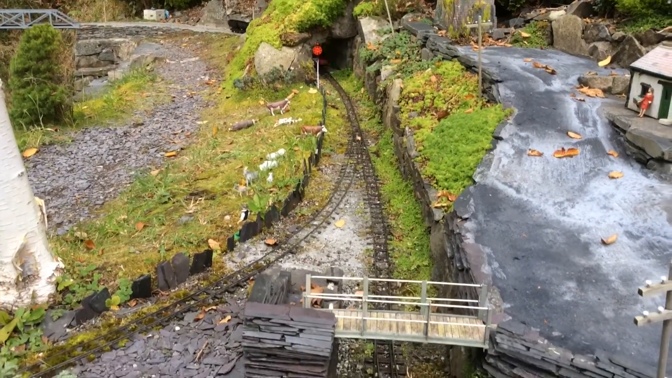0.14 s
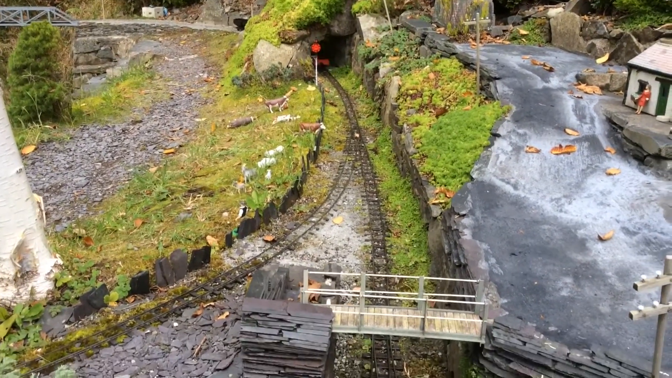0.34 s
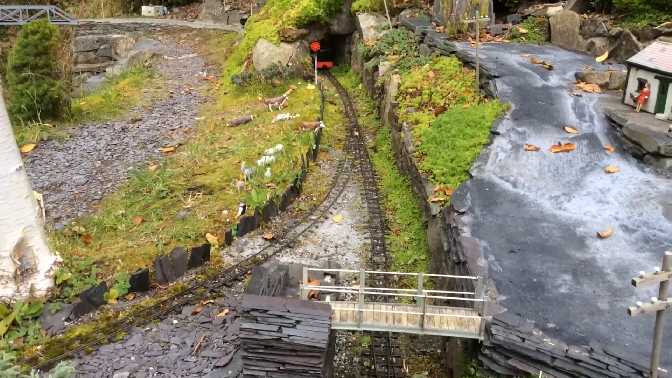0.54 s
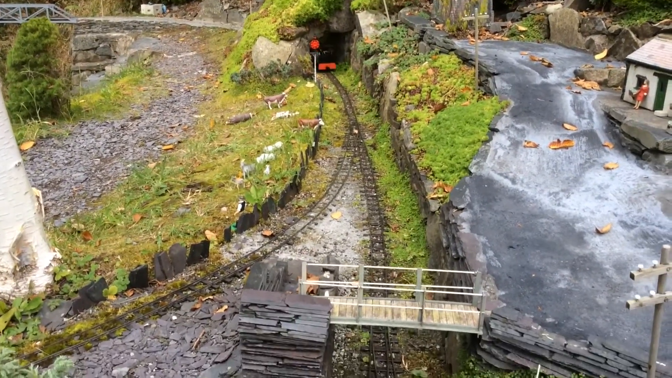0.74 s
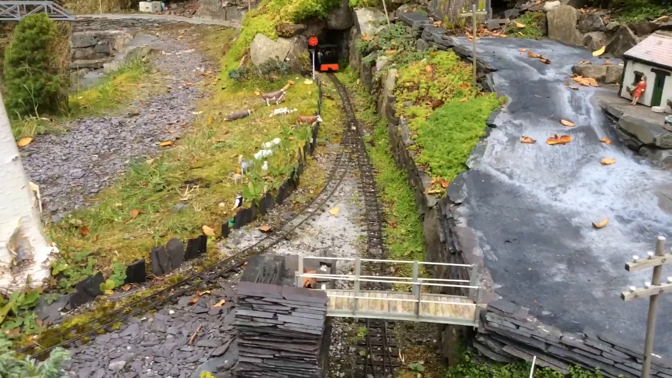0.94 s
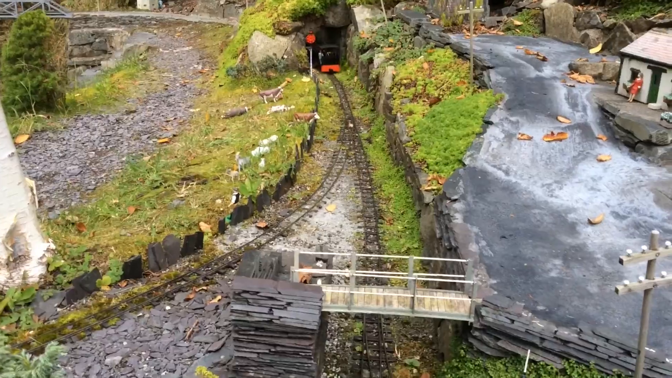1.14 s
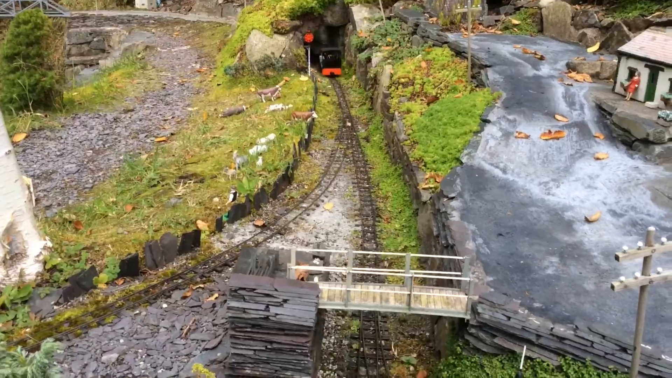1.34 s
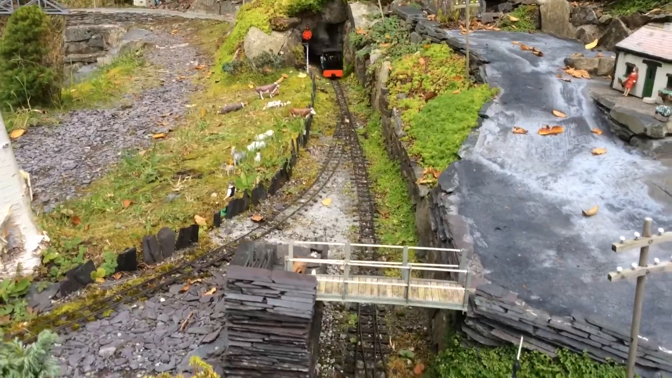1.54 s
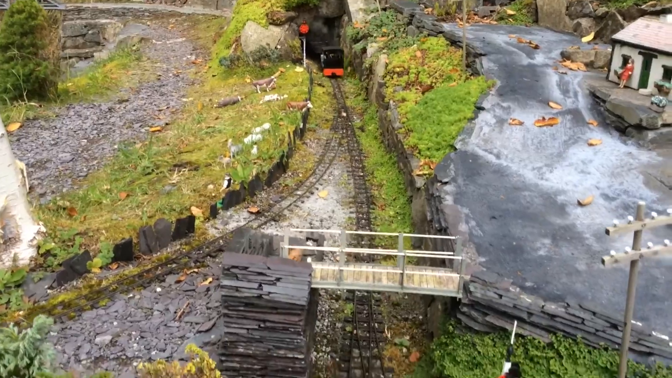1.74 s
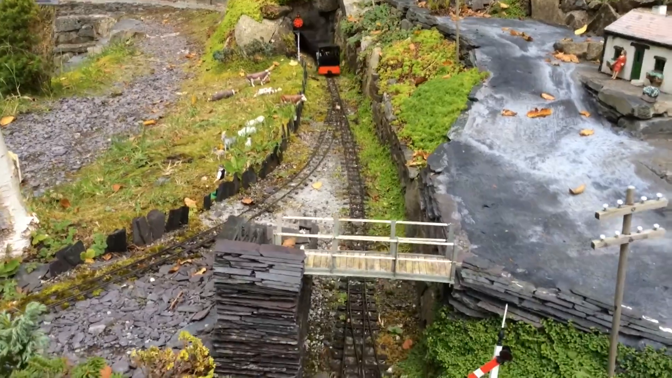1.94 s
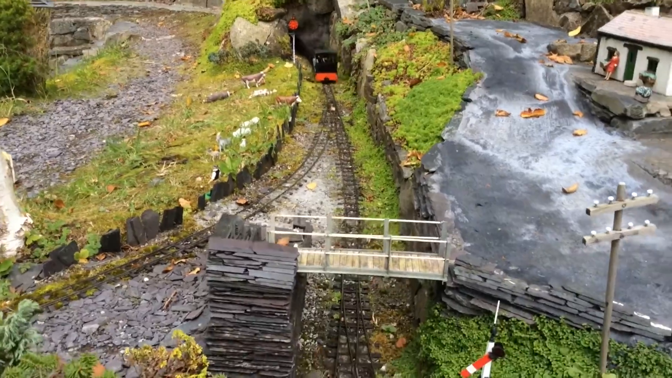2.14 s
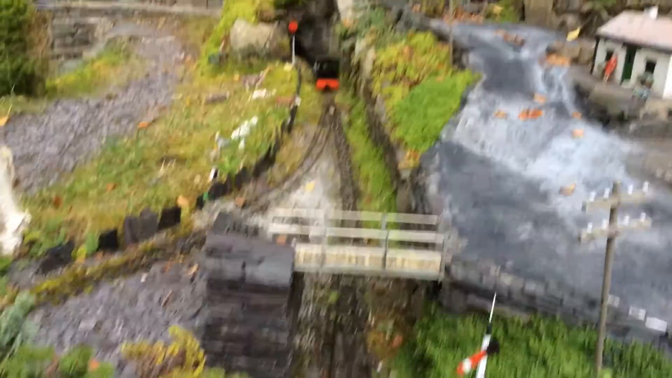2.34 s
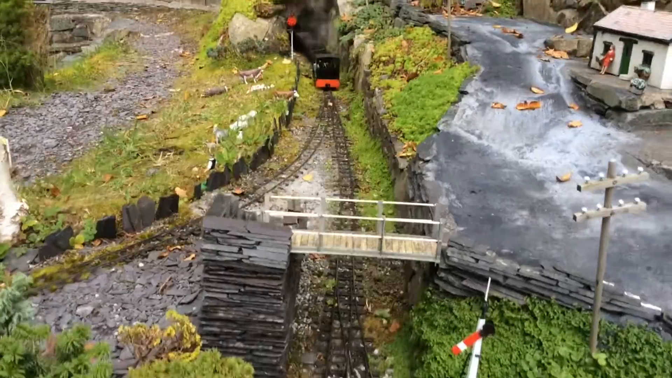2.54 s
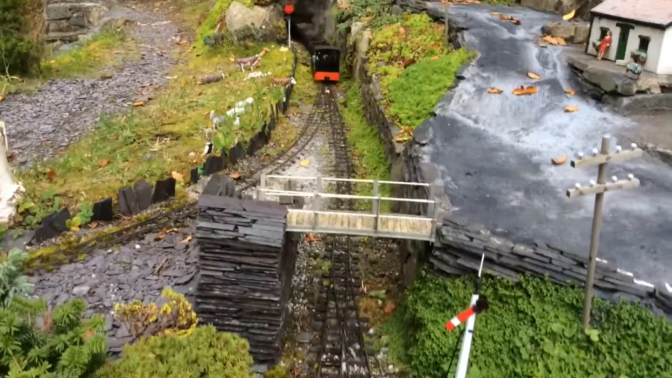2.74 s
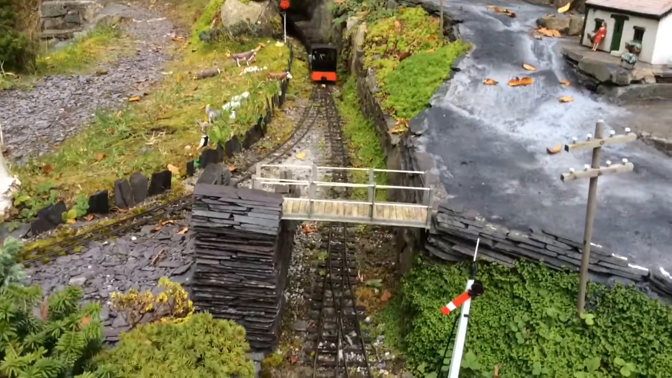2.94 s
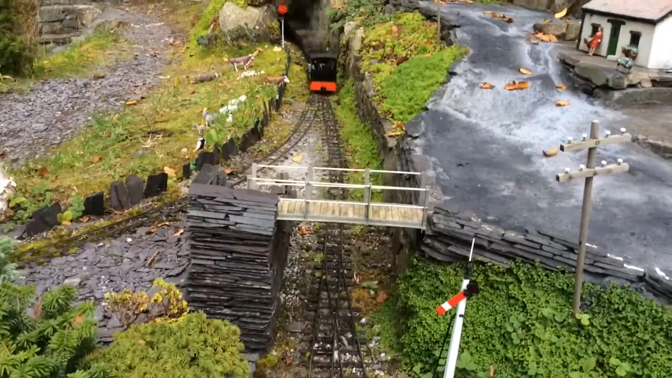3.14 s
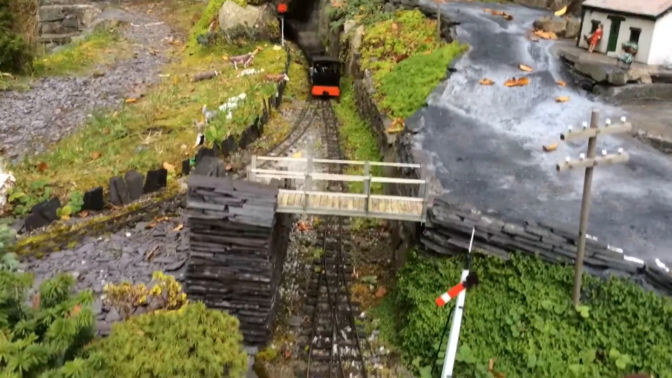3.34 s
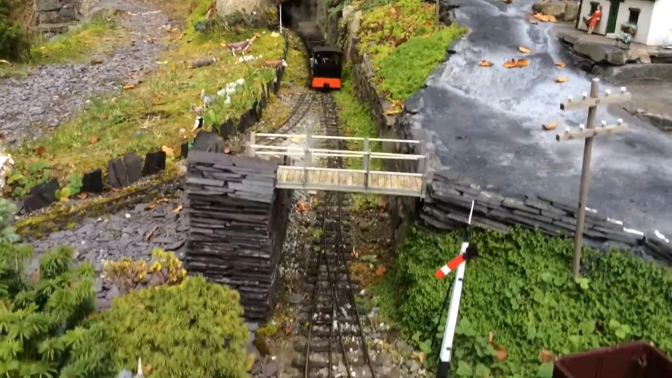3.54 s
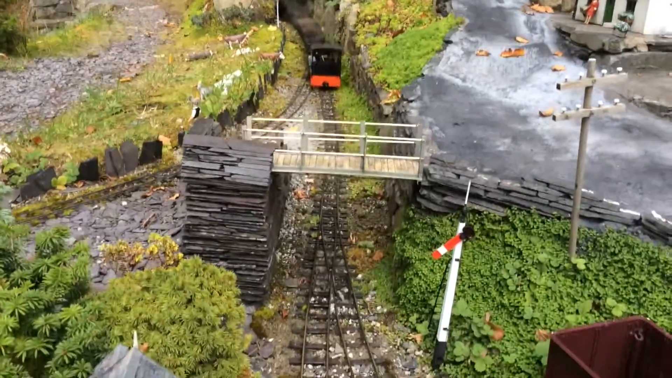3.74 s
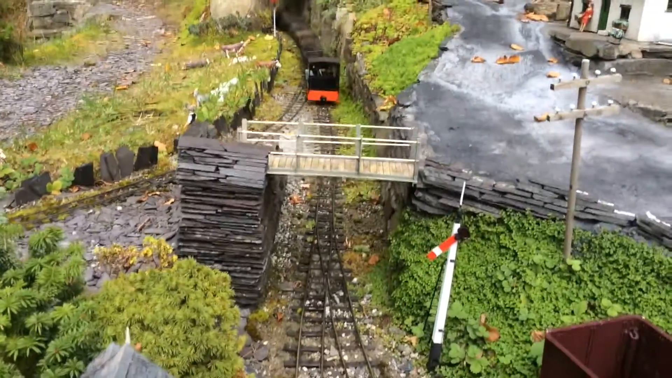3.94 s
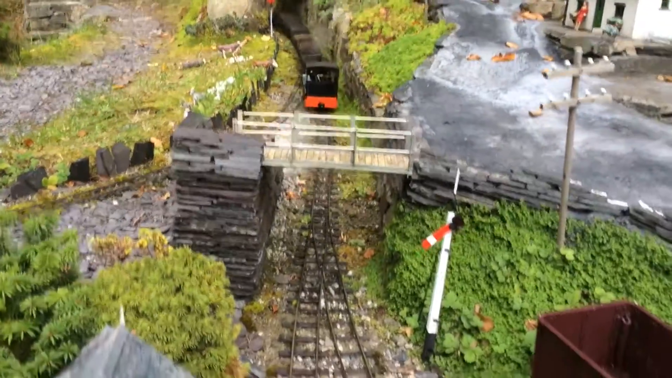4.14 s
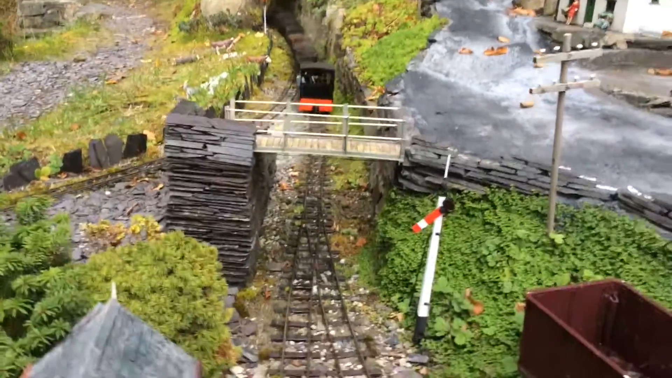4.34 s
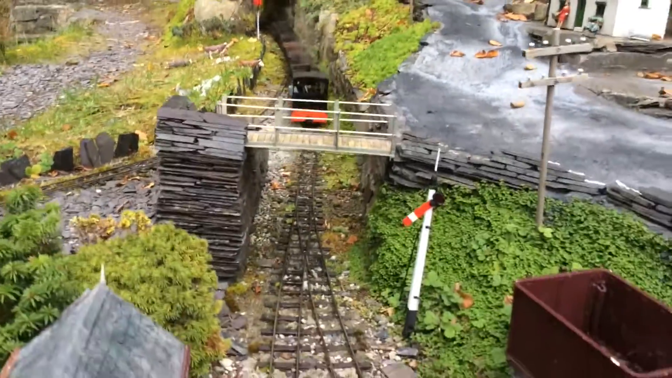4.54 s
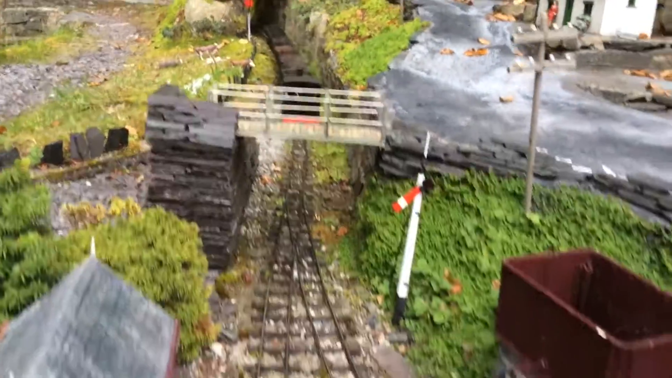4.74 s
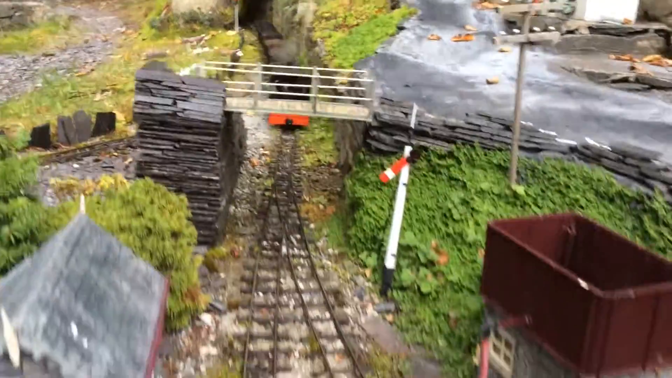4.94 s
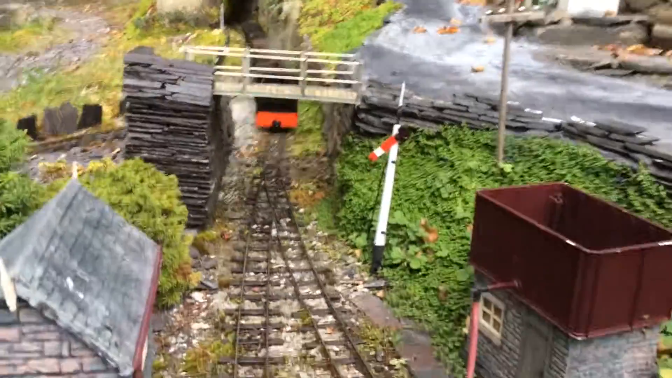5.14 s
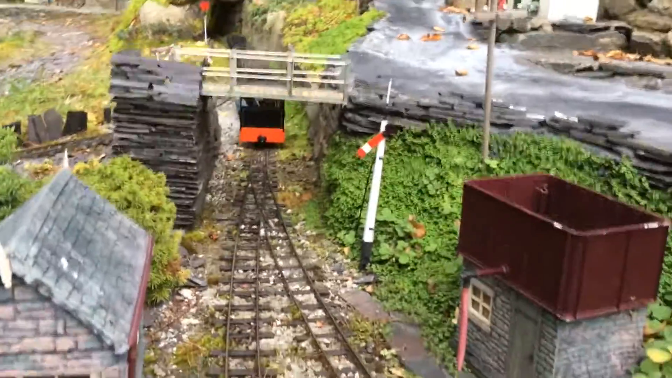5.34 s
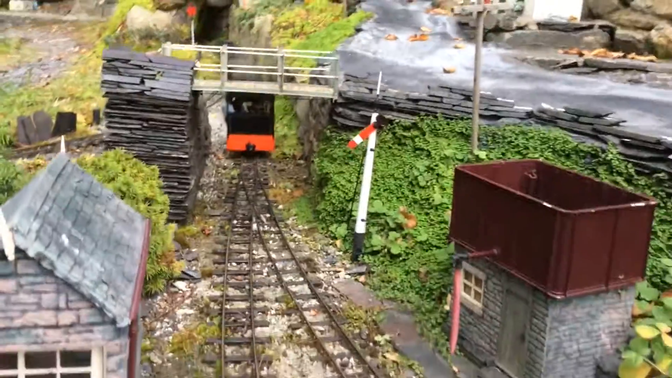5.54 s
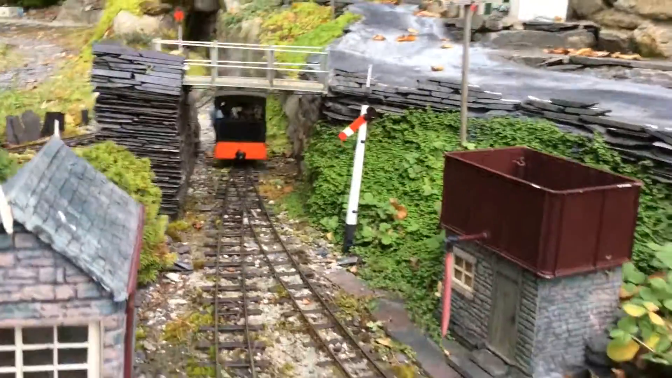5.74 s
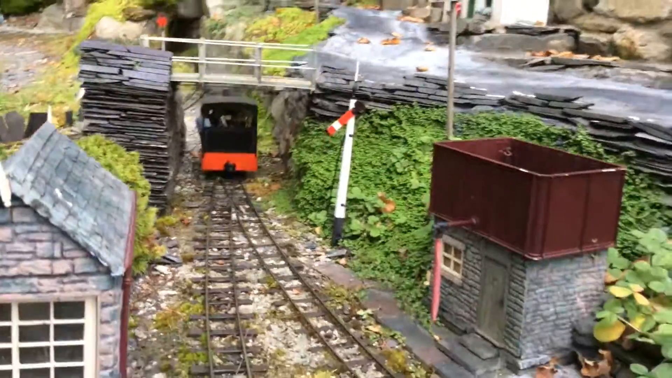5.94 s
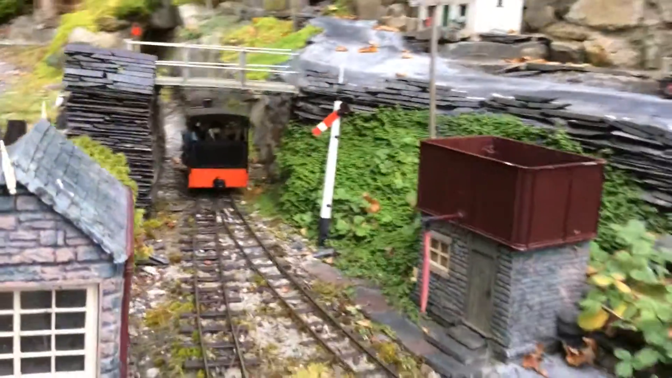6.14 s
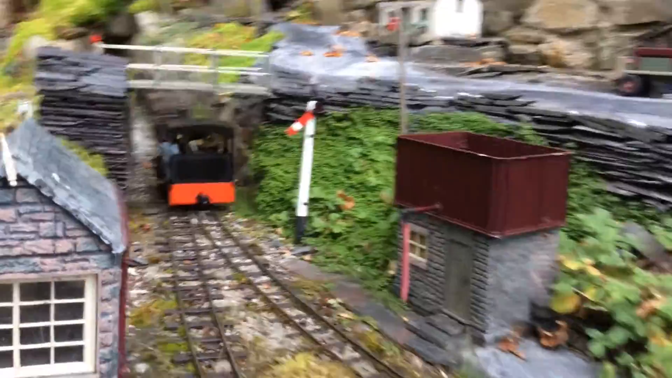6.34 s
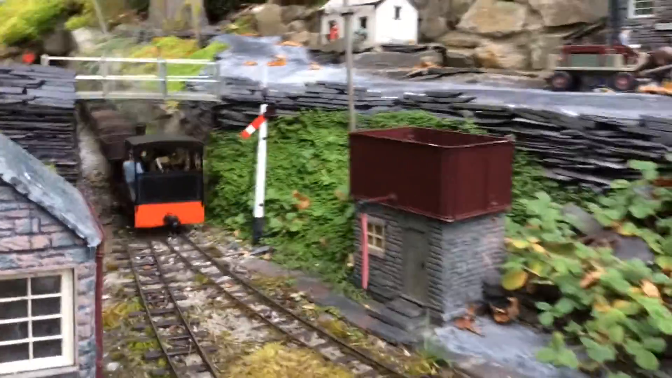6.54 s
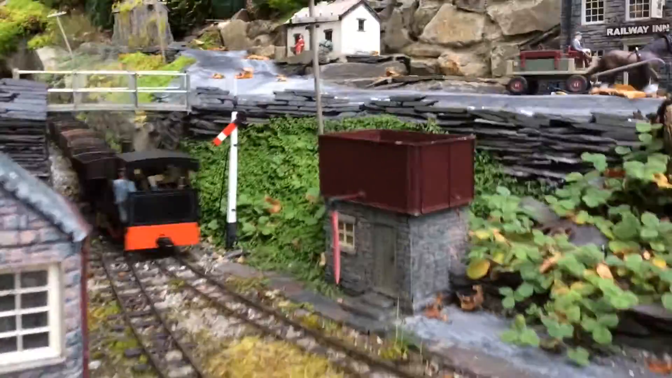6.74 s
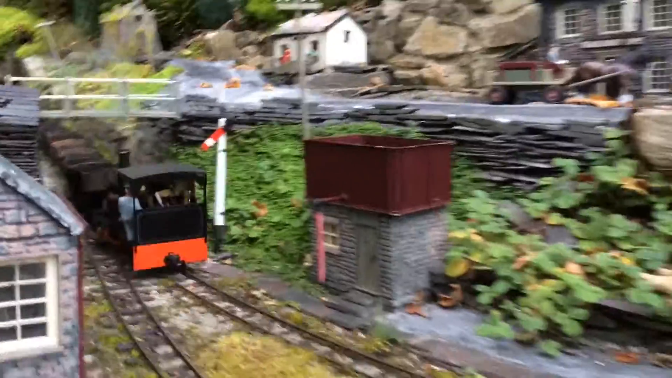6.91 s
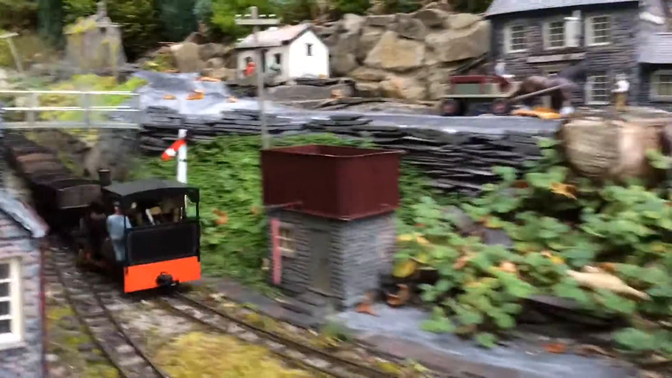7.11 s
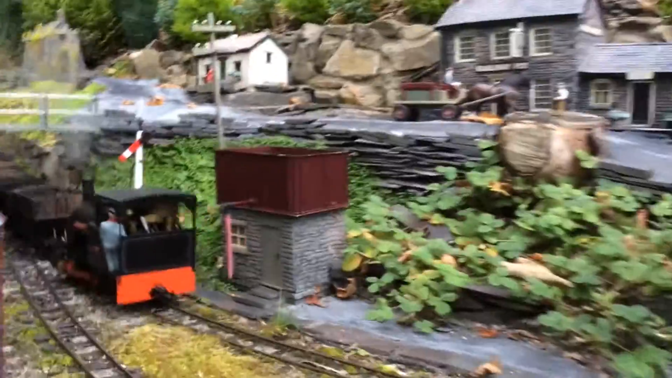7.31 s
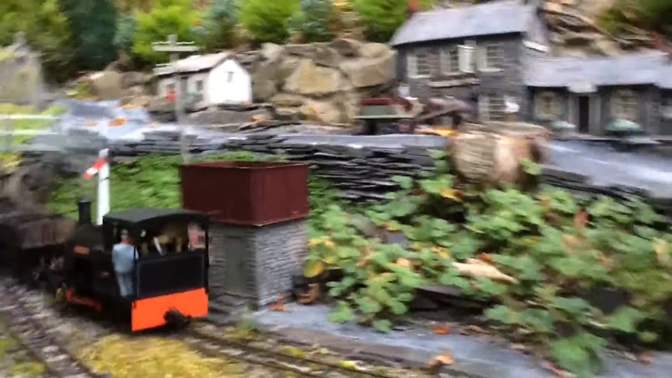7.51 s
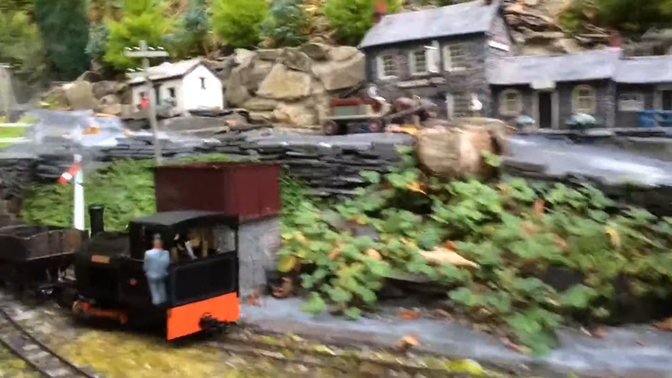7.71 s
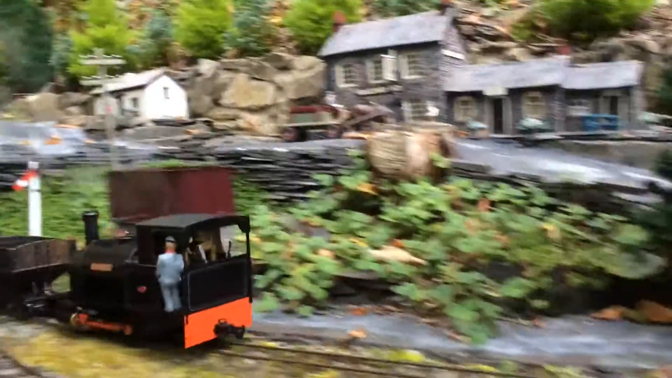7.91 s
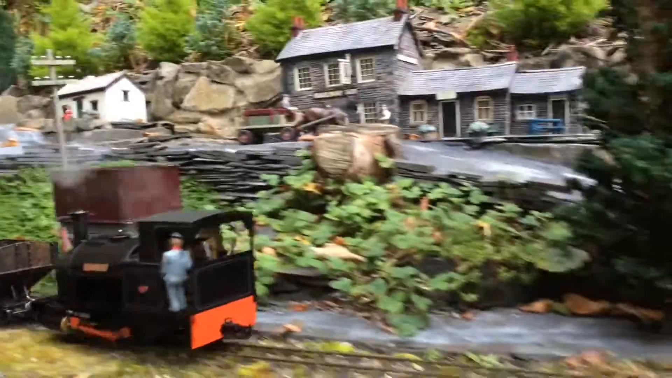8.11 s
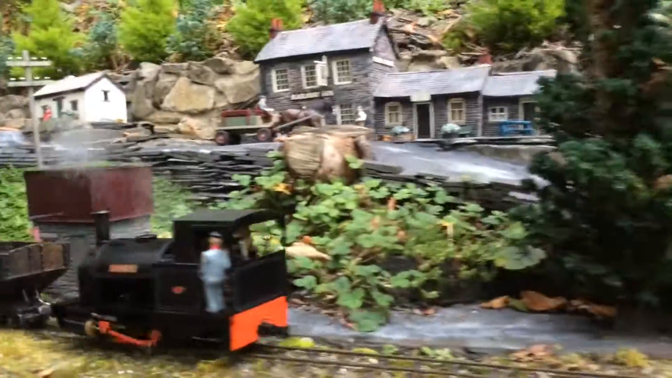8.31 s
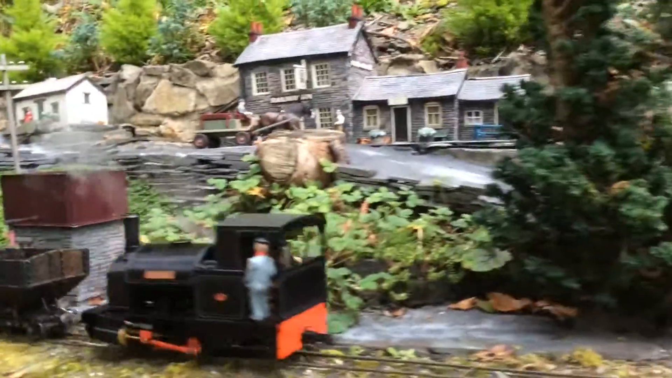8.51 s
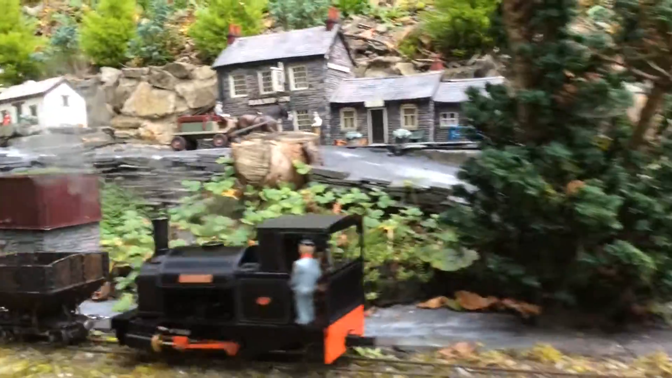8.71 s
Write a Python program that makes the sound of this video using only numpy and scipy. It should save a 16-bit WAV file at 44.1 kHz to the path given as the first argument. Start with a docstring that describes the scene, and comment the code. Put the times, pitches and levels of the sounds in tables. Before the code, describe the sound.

A small live-steam locomotive nears with quick, uneven chuffs growing louder and hissier, over rumbling wheels, while cloth rubs and crackles by the microphone.

```python
"""Quick steam chuffs come first, with a soft tunnel boom, as a small live-steam locomotive nears the camera.
Noise puffs at four angles of each wheel turn make the exhaust; a sizzle, a hollow flue hoot (resonant
noise) and rumbling wheels join it. Dull bumps of the hand are short swings; clacks are damped noise bursts.
Later, stiff cloth rubs and crackles by the microphone: noise and random slips shaped by strokes, and ticks.
Behind it all lie soft outdoor air and a wavering low drone, both of filtered noise."""
import sys
import numpy as np
from scipy import signal
from scipy.fft import rfft, irfft
from scipy.io import wavfile
from scipy.ndimage import uniform_filter1d

SR = 44100
rng = np.random.default_rng(int(sys.argv[2]) if len(sys.argv) > 2 else 0)


def put_to_file(sound):
    """Save the sound as 16-bit audio at rate SR, in the file named by the first command-line argument."""
    columns = np.atleast_2d(sound).T  # one column per channel
    safe = np.clip(columns, -1, 1)
    whole_steps = np.round(safe * 32767)
    wavfile.write(sys.argv[1], SR, whole_steps.astype(np.int16))


N = 391166
TIME = np.arange(N) / SR  # seconds

# Every colour table is a relative spectrum: the noise it shapes is levelled afterwards.


def gain_of(db):
    """Turns decibels into a linear gain."""
    return 10 ** (np.asarray(db) / 20)


def evened(x):
    """Scales a sound to an rms of 1."""
    return x / np.sqrt(np.mean(x ** 2) + 1e-20)


def peaked(x):
    """Scales a sound to a peak of 1."""
    return x / abs(x).max()


def curve(rows):
    """Draws a two-column table as straight lines over the whole scene."""
    times, values = np.transpose(rows)
    return np.interp(TIME, times, values)


def add(mix, start_s, sound):
    """Mixes a sound in at its start time, cutting what runs past the end."""
    part = mix[max(round(start_s * SR), 0):][:len(sound)]
    part += sound[:len(part)]


def coloured(x, points, size=4096):
    """Gives a sound the spectrum of a table through a minimum-phase filter."""
    table_hz, table_db = np.transpose(points)
    hz = abs(np.fft.fftfreq(size, 1 / SR))
    db = np.interp(np.log(hz + 1), np.log(table_hz + 1), table_db)
    # the Hilbert transform of the log gain supplies the phase of a causal filter
    spectrum = np.exp(np.conj(signal.hilbert(np.log(gain_of(db)))))
    taps = np.fft.ifft(spectrum).real[:size // 2]
    return signal.oaconvolve(x, taps)[:len(x)]


def noise(points):
    """Makes steady noise of rms 1 with the spectrum of a table."""
    return evened(coloured(rng.standard_normal(N), points))


def resonate(x, hz, width_hz):
    """Rings a steep resonance: two equal band-passes in a row, each of the given width."""
    b, a = signal.iirpeak(hz, hz / min(width_hz, SR / 4), SR)
    once = signal.lfilter(b, a, x)
    return signal.lfilter(b, a, once)


def wander(rate_hz):
    """Draws a random curve of rms 1 that moves no faster than the rate."""
    hz = np.fft.rfftfreq(N, 1 / SR)
    spectrum = rfft(rng.standard_normal(N))
    return evened(irfft(spectrum * (hz < rate_hz), N))


def patchy(x, depth_db, patch_hz, patch_s):
    """Turbulence shifts the colour at random, in patches of frequency and time; depth is rms."""
    z = signal.stft(x, nperseg=512, noverlap=384)[2]
    field = rng.standard_normal(z.shape[::-1])  # frames by frequency bins
    field = uniform_filter1d(field, max(1, round(patch_s * SR / 128)), axis=0)
    field = uniform_filter1d(field, max(1, round(patch_hz * 512 / SR)), axis=1)
    shifted = z * gain_of(depth_db * evened(field).T)
    return evened(signal.istft(shifted, nperseg=512, noverlap=384)[1][:N])


def burst(decay_s):
    """Makes a 50 ms burst of noise that dies away exponentially."""
    t = np.arange(SR // 20) / SR
    return rng.standard_normal(len(t)) * np.exp(-t / decay_s)


# speed of the driving wheels: time_s, speed_turns_per_s
WHEEL_SPEED = [(0.0, 4.7636), (1.8, 5.4432), (2.7, 5.3313), (3.0, 5.1855), (4.2, 5.0443), (5.4, 5.065),
               (6.0, 4.6606), (6.9, 4.4667), (7.2, 4.7441), (7.8, 4.6827), (8.87, 3.769)]
# four exhaust beats of one wheel turn, uneven as the valves are set: share_of_turn, relative_level_db
VALVE_BEATS = [(0.124, 1.2), (0.346, -3), (0.631, 0), (.893, 1.05)]
# strength of the exhaust at the camera, before beat and blast trims: time_s, level_db
EXHAUST_LEVEL = [(0, -55), (.6, -54), (1.0, -47), (1.45, -47.5), (1.65, -50.5), (2.15, -49.5), (2.95, -51),
                 (3.8, -48), (4.8, -46), (5.2, -47.5), (5.8, -42.5), (6.6, -41), (6.95, -35.5), (7.45, -38),
                 (7.9, -31), (8.2, -33), (8.5, -31), (8.87, -31.5)]


def chuffs(scatter_db=0.4):
    """The valves open at four fixed angles of every wheel turn: rows of start_s, level_db."""
    turns = np.cumsum(curve(WHEEL_SPEED)) / SR
    share, beat_db = np.transpose(VALVE_BEATS)
    whole_turns = np.arange(int(turns[-1]) + 1)
    angles = (whole_turns[:, None] + share).ravel()  # in turns
    times = np.interp(angles, turns, TIME)
    db = np.interp(times, TIME, curve(EXHAUST_LEVEL))
    db = db + np.resize(beat_db, len(times)) + scatter_db * rng.standard_normal(len(times))
    return np.column_stack([times, db])[angles < turns[-1]]


def puffs(beats, rise_s, decay_s, leak, average_s=0.298):
    """Each valve opening swells and dies away over a steady leak: steam flow and its running rms."""
    t = np.arange(SR // 10) / SR
    puff = peaked((1 - np.exp(-(t / rise_s) ** 3)) * np.exp(-t / decay_s))
    flow = np.zeros(N)
    for start_s, level_db in beats:
        add(flow, start_s, gain_of(level_db) * puff)
    running_rms = np.sqrt(uniform_filter1d(flow ** 2, int(average_s * SR)) + 1e-12)
    return np.hypot(flow, leak * running_rms), running_rms


# colour of the blast, far off and close by: pitch_hz, relative_level_db_per_hz
BLAST_FAR = [(300, -37.5), (800, -7.5), (1100, -16.5), (1600, -17), (2200, -10.5), (2500, -2), (2780, 2.5),
             (3250, -2), (3820, 1), (4150, -8.5), (4600, -22), (6000, -20), (9000, -31)]
BLAST_NEAR = [(300, -24), (800, -13.5), (1150, -8), (1400, -14), (1800, -4), (2150, -5.5), (2500, 4),
              (3100, 4.5), (3800, 4), (4150, -12.5), (4600, -35), (6000, -19.5), (9000, -41)]
# how close the engine is: time_s, nearness (0 far, 1 close)
NEARNESS = [(0, 0.061), (4.5, 0.031), (6, 0.65), (7.5, 0.802), (8.87, 0.76)]
# colour of the steam sizzling in the nozzle: pitch_hz, relative_level_db_per_hz
SIZZLE_COLOUR = [(3000, -28), (4600, -17), (5700, -21.5), (6700, -4.5), (7400, -18.5), (8200, -19),
                 (8700, -7), (9100, 6.5), (9600, 0), (10300, -6), (11200, -10.5), (12800, -33),
                 (15500, -43)]
# strength of the sizzle, before its trim: time_s, level_db
SIZZLE_LEVEL = [(0, -62.5), (.5, -57.5), (1.3, -54.5), (1.8, -57.5), (5.3, -56), (6.3, -55.5), (7.5, -48),
                (8.2, -50.5), (8.87, -45.5)]


def exhaust(beats, blast_trim_db=1.16, sizzle_trim_db=0.53, spit_db=0.7):
    """Puffs of turbulent steam sound the chimney; its lower resonances fill in close by."""
    near = np.clip(curve(NEARNESS), 0, 1)
    colour = np.sqrt(1 - near) * noise(BLAST_FAR) + np.sqrt(near) * noise(BLAST_NEAR)
    colour = patchy(colour, depth_db=2.5, patch_hz=330, patch_s=0.06)
    spit = evened(gain_of(spit_db * wander(450)))  # droplets in the wet steam roughen the flow

    far_flow, _ = puffs(beats, rise_s=0.0077, decay_s=0.015, leak=0.72)
    near_flow, _ = puffs(beats, rise_s=0.0095, decay_s=0.013, leak=0.42)
    flow = (1 - near) * far_flow + near * near_flow
    blast = colour * flow * gain_of(blast_trim_db)

    jet, jet_rms = puffs(beats, rise_s=0.0069, decay_s=0.02, leak=0.36)
    pulse = jet / jet_rms  # keeps the beat; the sizzle has its own level curve
    hiss = patchy(noise(SIZZLE_COLOUR), depth_db=2.5, patch_hz=420, patch_s=0.098)
    sizzle = hiss * pulse * gain_of(curve(SIZZLE_LEVEL) + sizzle_trim_db)
    return (blast + sizzle) * spit


# strength of the flue's hoot, before its trim: time_s, level_db
FLUE_LEVEL = [(0, -65), (.8, -67), (1.35, -57.5), (1.9, -61), (2.7, -54.5), (4.2, -53.5), (6.3, -53),
              (7.5, -57), (8.3, -41.5), (8.87, -40.5)]


def flue(beats, hz=924.7, width_hz=111, trim_db=-0.77, flutter_db=2.0, flutter_hz=9):
    """The draught through the fire, tugged by each beat, excites one hollow, fluttering resonance."""
    hoot = evened(resonate(rng.standard_normal(N), hz, width_hz))
    draught, draught_rms = puffs(beats, rise_s=0.0062, decay_s=0.022, leak=2.3)
    flutter = evened(draught / draught_rms * gain_of(flutter_db * wander(flutter_hz)))
    return hoot * flutter * gain_of(curve(FLUE_LEVEL) + trim_db)


# colour of the wheels on the rails: pitch_hz, relative_level_db_per_hz
ROLLING_COLOUR = [(130, -11), (215, 0.5), (290, -7.5), (420, -5.5), (560, -6), (700, -11.5), (1300, -10.5),
                  (2500, -20.5), (6000, -27)]
# strength of the rolling, before its lumpiness: time_s, level_db
ROLLING_LEVEL = [(0, -61.5), (3, -62), (5, -56), (5.8, -58), (6.3, -52.5), (7.5, -52), (8.87, -50)]


def rolling(lumpy_db=2.5):
    """Small wheels rumble over uneven rails: coloured noise with a randomly lumpy level."""
    rumble = patchy(noise(ROLLING_COLOUR), depth_db=2.0, patch_hz=260, patch_s=0.11)
    return rumble * gain_of(curve(ROLLING_LEVEL) + lumpy_db * wander(25))


# low boom while the train leaves the tunnel: time_s, level_db
TUNNEL_LEVEL = [(0, -63.5), (.7, -62.5), (1.3, -63), (1.7, -78), (3, -98)]


def tunnel(hz=200, width_hz=110):
    """The tunnel mouth booms softly until the train is out: resonant noise that fades."""
    boom = evened(resonate(rng.standard_normal(N), hz, width_hz))
    return boom * gain_of(curve(TUNNEL_LEVEL))


def echoes(x, ground=0.041, wall=0.21):
    """Track bed and two stone walls reflect the exhaust; the extra paths change as it nears."""
    near = curve(NEARNESS)
    # far_delay_s, near_delay_s, strength
    paths = [(0.0011, 0.0035, ground), (0.0035, 0.0024, wall), (0.0072, 0.0058, 1.06 * wall)]
    out = x.copy()
    for far_s, near_s, strength in paths:
        delay_s = far_s + (near_s - far_s) * near
        out += strength * np.interp((TIME - delay_s) * SR, np.arange(N), x)
    return out / np.sqrt(1 + ground ** 2 + 2.0 * wall ** 2)


# strokes of cloth by the microphone, levels before the cloth's trims:
# start_s, rise_s, hold_s, fizz_db, scrape_db, rumble_db, settling_db (relative to full pressure)
STROKES = [(6.383, .035, 0.074, -29.5, -40.5, -42, -14.5), (6.675, 0.19, 0.076, -24, -34, -36.5, -3.5),
           (7.14, 0.085, 0.083, -20.5, -34.5, -38.5, -6.5), (7.339, 0.052, 0.058, -30, -45, -65, -4.5),
           (7.622, 0.049, 0.023, -31, -37.5, -51, -0.5), (7.758, 0.064, 0.058, -37, -34, -48, 0.5)]


def strokes(press_power=1.23, release_s=0.014, settle_db_per_s=106,
            scrape_follow=0.43, rumble_settle_db=-9):
    """Strokes press, hold and let go, then the cloth settles: gains of fizz, scrape and rumble."""
    fizz, scrape, rumble = np.zeros((3, N))
    for start, rise_s, hold_s, fizz_db, scrape_db, rumble_db, settle_db in STROKES:
        press = np.clip((TIME - start) / rise_s, 0, 1) ** press_power
        after_s = np.maximum(TIME - start - rise_s - hold_s, 0)
        release = np.exp(-after_s / release_s)
        settle = gain_of(settle_db - settle_db_per_s * after_s)
        rub = press * np.maximum(release, settle)
        weight = press * np.maximum(release, settle * gain_of(rumble_settle_db))
        fizz = np.hypot(fizz, gain_of(fizz_db) * rub)
        scrape = np.hypot(scrape, gain_of(scrape_db) * weight ** scrape_follow)
        rumble = np.hypot(rumble, gain_of(rumble_db) * weight)
    return fizz, scrape, rumble


# how taut the cloth is: time_s, tautness (0 slack, 1 taut)
TAUTNESS = [(6.4, 0.58), (6.8, 0.3), (6.95, 0.86), (7.2, 0.7), (7.45, 1), (7.7, 1), (7.9, 0.45),
            (8.1, 0.27)]
# colours of slack cloth, taut cloth, scraping and the shaken camera: pitch_hz, relative_level_db_per_hz
FIZZ_SLACK = [(300, -46), (1000, -3.5), (3500, -10), (6000, -25), (7300, -14), (8300, -2.5), (9500, 1.5),
              (10700, -6), (11800, 5.5), (13000, -12.5), (15300, -3.5)]
FIZZ_TAUT = [(300, -38), (1000, -24), (3500, -9), (6000, -14), (7300, -18), (8200, -8), (9500, -16),
             (10500, -6), (11800, 3.5), (13000, -0.5), (15300, -3)]
SCRAPE_COLOUR = [(150, -23), (300, -12.5), (700, -1), (1400, -2.5), (2500, -7), (4500, 3.5), (6500, -4.5),
                 (10000, 7), (15000, -26)]
RUMBLE_COLOUR = [(20, -31), (50, -13), (110, 0.5), (190, 2.5), (290, -2), (400, -8.5), (700, -11),
                 (2000, -34)]
# colour of snapping creases, and of the clacks' bright edge: pitch_hz, relative_level_db_per_hz
SNAP_COLOUR = [(500, -12.5), (2500, -34), (6000, -7.5), (8300, 1.5), (10500, -9), (12300, 7.5),
               (15500, -4.5)]


def cloth(fizz_trim_db=2.5, scrape_trim_db=-0.1, rumble_trim_db=0.0, slips_per_s=5000, flutter_db=1.2,
          crackle_trim_db=-14, crackle_follow=0.73, crackles_per_s=90):
    """Thousands of fibres slip each second; rubbing also scrapes, crackles and shakes the camera."""
    force, scraping, shaking = strokes()
    flutter = gain_of(flutter_db * wander(72))

    sizes = rng.standard_normal(N)
    slips = evened(sizes * (rng.random(N) < slips_per_s / SR))
    slips = slips + 0.6 * rng.standard_normal(N)  # a smooth hiss between the slips
    taut = np.clip(curve(TAUTNESS), 0, 1)
    slack_fibres = evened(coloured(slips, FIZZ_SLACK))
    taut_fibres = evened(coloured(slips, FIZZ_TAUT))
    fibres = (1 - taut) * slack_fibres + taut * taut_fibres
    fizz = patchy(fibres, depth_db=2.0, patch_hz=600, patch_s=0.03) * force * gain_of(fizz_trim_db)

    scrape = patchy(noise(SCRAPE_COLOUR), depth_db=4.0, patch_hz=450, patch_s=0.042)
    scrape = scrape * scraping * gain_of(scrape_trim_db)

    creases = rng.standard_normal(N) * (rng.random(N) < crackles_per_s / SR)
    crackle = evened(coloured(creases, SNAP_COLOUR))
    crackle = crackle * force ** crackle_follow * gain_of(crackle_trim_db)

    rumble = noise(RUMBLE_COLOUR) * shaking * gain_of(rumble_trim_db)
    return flutter * (fizz + scrape + crackle) + rumble


# the loudest creases of the cloth snapping: start_s, peak_db, centre_hz
SNAPS = [(6.408, -16, 11900), (6.5434, -13, 13000), (6.728, -21, 11400), (6.8199, -6.5, 11000),
         (6.9401, -4, 7900), (6.9474, -6, 11600), (7.3009, -21, 11700), (7.3735, -1, 12900),
         (7.3878, -12, 12400), (7.8115, -10, 8950), (7.859, -10, 9100)]


def snaps(decay_s=0.00069, width_hz=5200):
    """Creases buckle with a dry, bright tick: a tiny noise burst through a broad resonance."""
    out = np.zeros(N)
    for start_s, peak_db, hz in SNAPS:
        tick = peaked(resonate(burst(decay_s), hz, width_hz))
        add(out, start_s, gain_of(peak_db) * tick)
    return out


# hard little clacks and scuffs:
# start_s, peak_db, centre_hz, decay_s, bright_edge_db (relative to the body)
CLACKS = [(2.5041, -30, 680, 0.0023, -40), (2.512, -32.5, 706, 0.0027, -40),
          (2.519, -38.5, 1030, 0.012, -45), (5.7272, -22, 2540, 0.00065, -4),
          (6.443, -22.5, 1720, 0.038, -34), (6.603, -23, 1800, 0.0014, 2), (7.137, -6, 1395, 0.00086, -6.5),
          (7.824, -3, 2400, 0.0031, 9.5), (7.824, -17.5, 820, 0.0009, -18), (7.829, -18, 2200, 0.0012, 3)]


def clacks(breadth=0.87, upper_ratio=3.04, upper_db=-7, upper_width_hz=1100, tail_db=-23, tail_s=0.018):
    """Hard parts knock: two damped modes, a bright edge and a short scatter from stones nearby."""
    out = np.zeros(N)
    for start_s, peak_db, hz, decay_s, edge_db in CLACKS:
        blow = burst(decay_s) + gain_of(tail_db) * burst(tail_s)
        body = peaked(resonate(blow, hz, breadth * hz))
        upper = peaked(resonate(blow, min(upper_ratio * hz, SR / 3), upper_width_hz))
        edge = peaked(coloured(blow, SNAP_COLOUR))
        # the brighter the edge, the stronger the upper mode
        upper_gain = gain_of(upper_db + edge_db / 4)
        clack = peaked(body + upper_gain * upper + gain_of(edge_db) * edge)
        add(out, start_s, gain_of(peak_db) * clack)
    return out


# dull bumps of the hand on the camera: middle_s, peak_db, centre_hz
BUMPS = [(1.578, -26.5, 310), (2.04, -33, 328), (2.2438, -29.5, 293), (2.545, -37.5, 104),
         (2.5756, -19.5, 386), (3.1063, -22.5, 410), (3.7508, -33.5, 322), (4.2394, -30.5, 417),
         (4.521, -39.5, 300), (7.3729, -34, 90), (7.3745, -36, 450)]


def bumps(cycles=0.37):
    """The camera case is pushed and springs back: a sine under a bell too short to ring."""
    out = np.zeros(N)
    t = np.arange(-SR // 50, SR // 50) / SR
    b, a = signal.butter(1, 80, "high", fs=SR)
    for middle_s, peak_db, hz in BUMPS:
        bell = np.exp(-(hz * t / cycles) ** 2)
        push = np.sin(2 * np.pi * hz * t + np.pi / 4) * bell
        bump = peaked(signal.lfilter(b, a, push))
        add(out, middle_s + t[0], gain_of(peak_db) * bump)
    return out


# colour of the outdoor air: pitch_hz, relative_level_db_per_hz
AIR_COLOUR = [(20, -34), (50, -2), (90, -3), (200, 0.5), (500, -3), (1500, -17), (5000, -22), (11000, -7.5),
              (15500, -17.5)]
# strength of the low drone: time_s, level_db
HUM_LEVEL = [(0, -65.5), (1.5, -69), (3.5, -67.5), (4.3, -64), (5.1, -57.5), (5.7, -62), (6.4, -65.5),
             (8.87, -63.5)]


def outdoors(air_db=-62.5, hum_hz=113, hum_width_hz=12):
    """Steady noise makes the soft air; a narrow resonance of noise makes the wavering drone."""
    air = gain_of(air_db) * noise(AIR_COLOUR)
    hum = evened(resonate(rng.standard_normal(N), hum_hz, hum_width_hz))
    return air + hum * gain_of(curve(HUM_LEVEL))


def scene():
    """Mixes the engine on its track, the noises at the camera and the garden, as one channel."""
    beats = chuffs()
    engine = echoes(exhaust(beats)) + flue(beats) + rolling() + tunnel()
    at_camera = cloth() + snaps() + clacks() + bumps()
    return (engine + at_camera + outdoors())[None]


def record(dry, low_cut_hz=42, edge_hz=15500):
    """Applies the microphone's bass cut and the recorder's upper band limit."""
    thin = signal.lfilter(*signal.butter(2, low_cut_hz, "high", fs=SR), dry)
    band_limit = signal.firwin(511, edge_hz, window=("kaiser", 9), fs=SR)
    return signal.oaconvolve(thin, band_limit[None], "same")


dry = scene()
out = record(dry)
put_to_file(out)
```